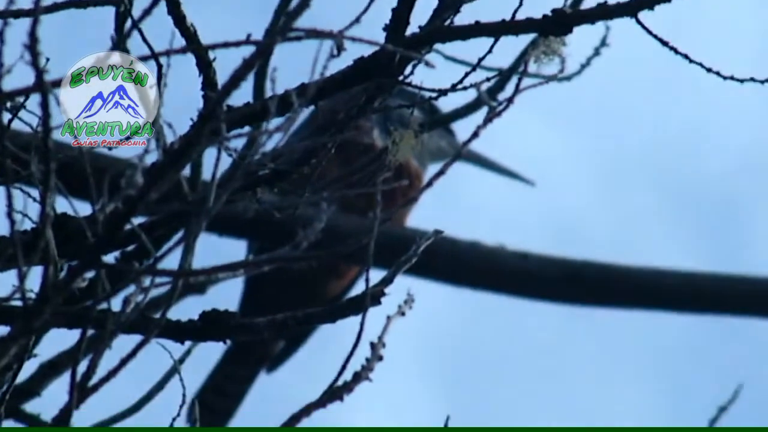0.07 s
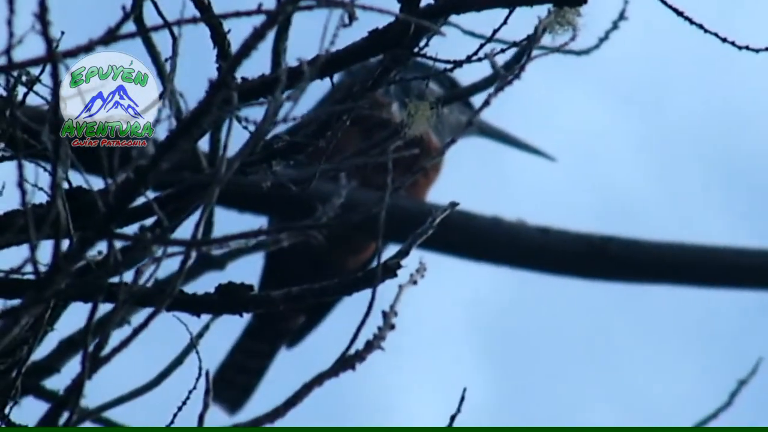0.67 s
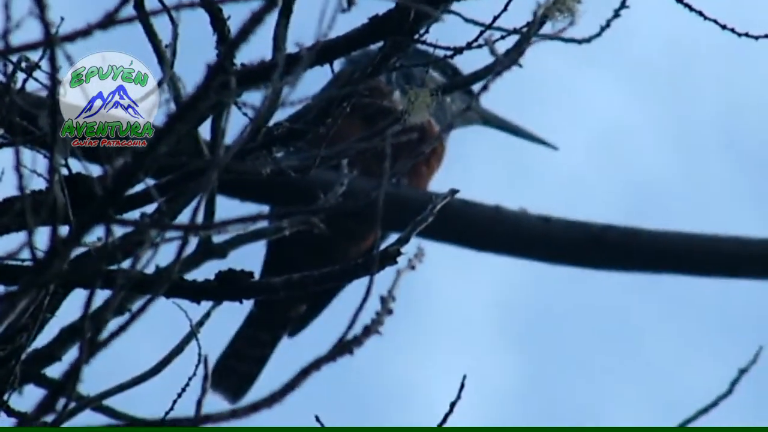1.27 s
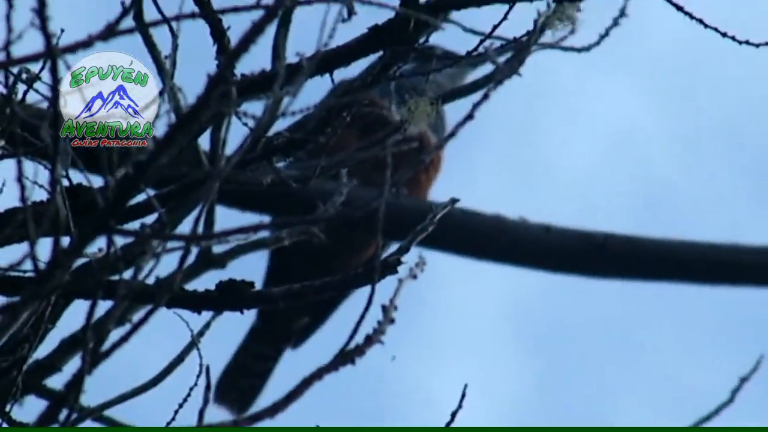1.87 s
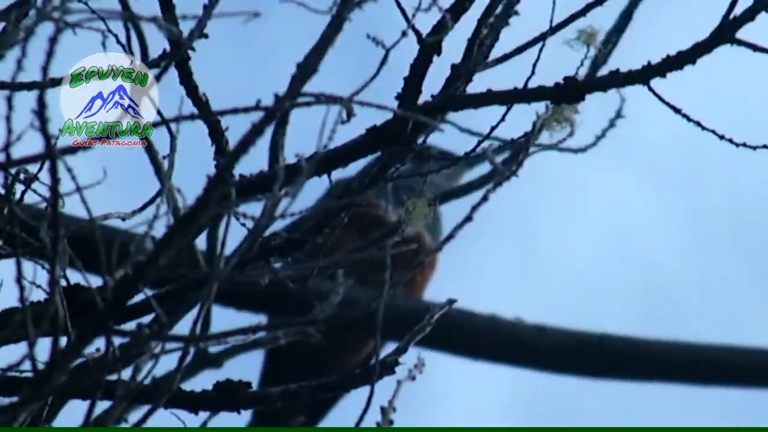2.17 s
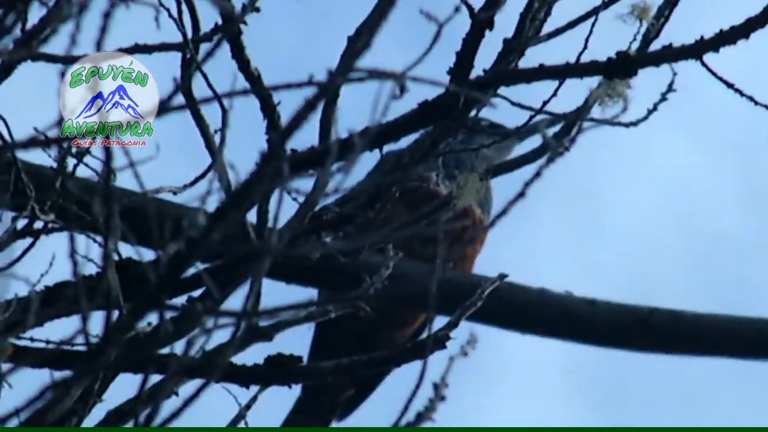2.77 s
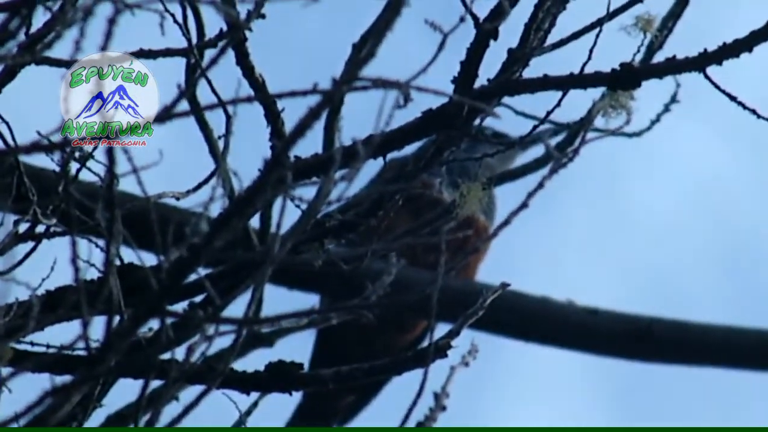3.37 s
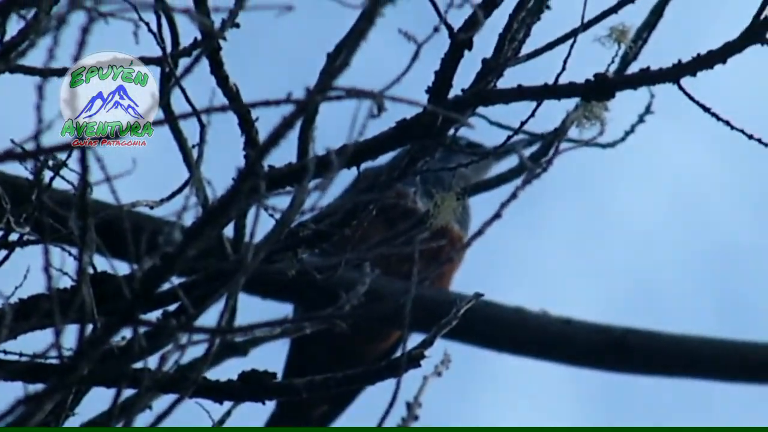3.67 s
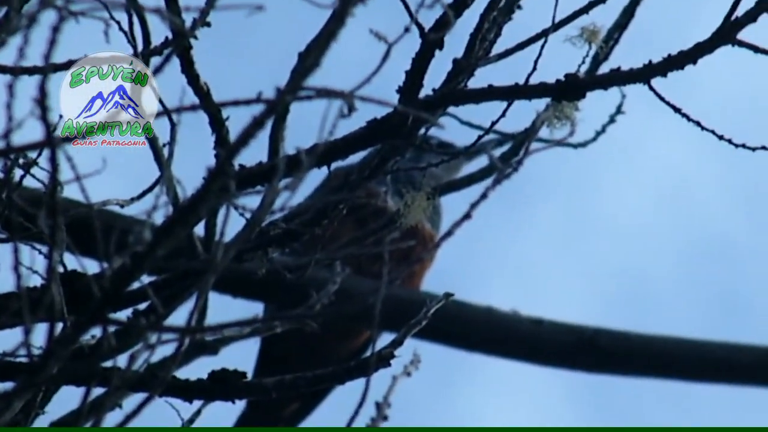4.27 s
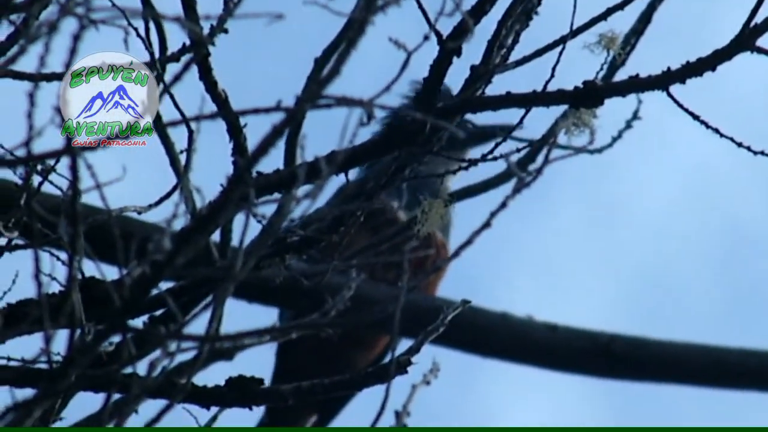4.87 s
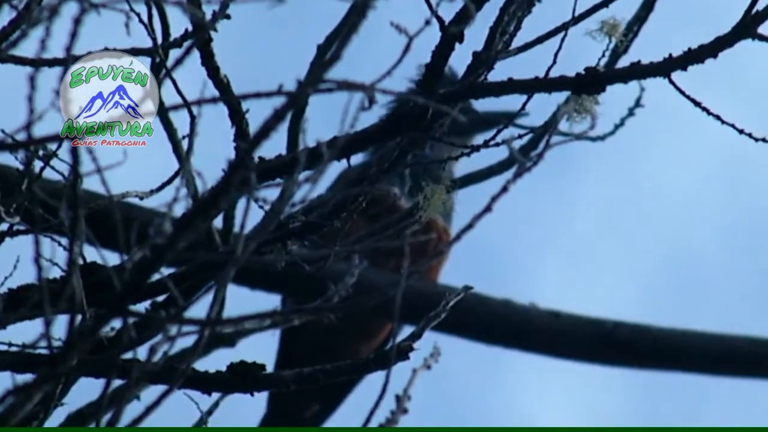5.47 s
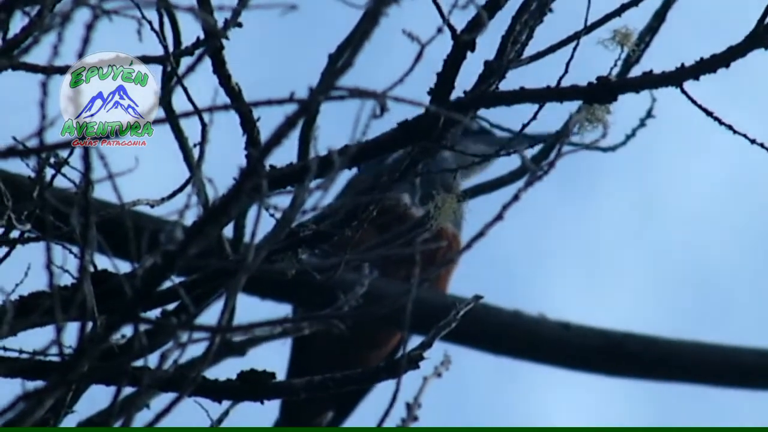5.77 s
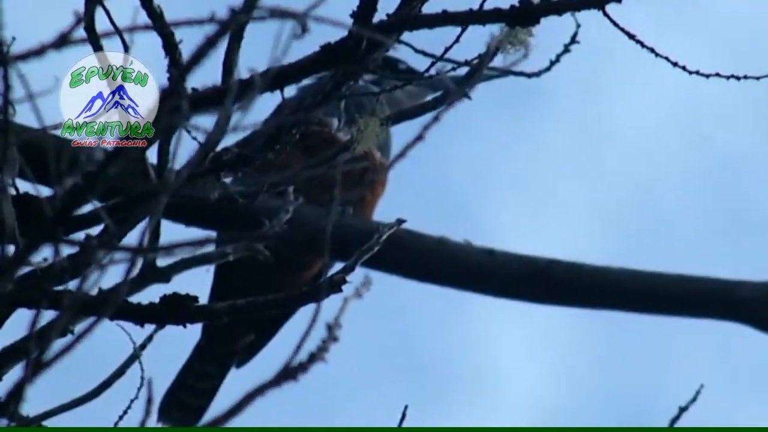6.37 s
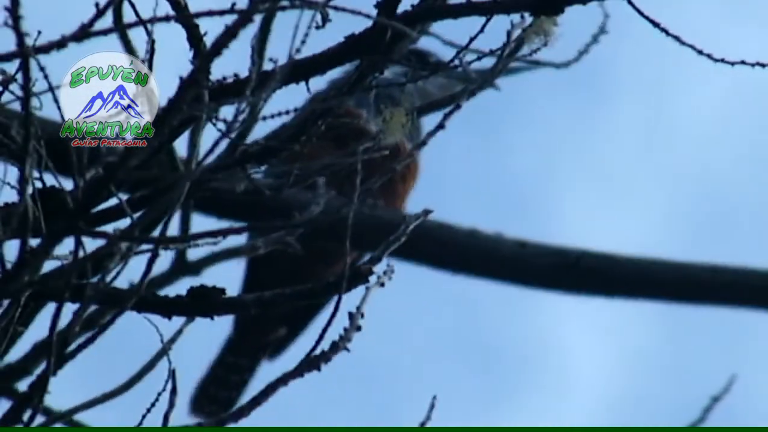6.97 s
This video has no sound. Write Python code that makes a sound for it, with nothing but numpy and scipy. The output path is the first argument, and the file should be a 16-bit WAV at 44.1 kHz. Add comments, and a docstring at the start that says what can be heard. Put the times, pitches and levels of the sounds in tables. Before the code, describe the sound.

A soft, low, uneven outdoor rush with a steady hiss runs throughout. Between about 1.1 and 1.7 seconds come five small dry ticks and one faint, thin, distant peep. At about 1.9 seconds a kingfisher in a tree begins a run of loud, harsh squawks, roughly three a second. Each is short and raspy, quavering at the start and dropping in pitch at the end. The background rush swells slightly around 3.2 seconds. From about 4.8 seconds a second bird joins with five higher, slightly cleaner, quavering screams, overlapping the first, whose calls grow weaker after 5 seconds. Another small tick falls near 6.4 seconds. The second bird stops at about 6.7 seconds and the kingfisher's last call ends near 6.9. The surrounding trees give every call a short, bright echo. The sound is centred and nearly mono.

```python
"""A soft outdoor rush and recorder hiss, with a few small ticks and one faint, far peep. Then a kingfisher
perched in a tree gives a run of harsh falling calls; a second, higher voice joins in with quavering ones.
Each call is a stack of harmonics shaken by a fast flutter, with a rasp of turbulent air.
Trunks and the wood around answer. All is nearly mono."""
import sys
import numpy as np
from scipy import signal
from scipy.fft import rfft, irfft, next_fast_len
from scipy.io import wavfile
from scipy.ndimage import map_coordinates

SR = 44100
rng = np.random.default_rng(int(sys.argv[2]) if len(sys.argv) > 2 else 0)


def persist_wave(psi):
    """Save psi, clipped to +-1, as 16-bit WAV."""
    counts = np.round(np.clip(psi, -1, 1) * 32767).astype(np.int16)
    wavfile.write(sys.argv[1], SR, np.atleast_2d(counts).T)


N = 310023


def amp(db):
    """Decibels to gain."""
    return 10 ** (np.asarray(db) / 20)


def unit(x):
    """Scale to rms 1."""
    return x / np.sqrt(np.mean(x ** 2) + 1e-20)


def ramp(x):
    """Clip to 0..1."""
    return np.clip(x, 0, 1)


def bump(x, centre, width):
    """Bell curve of height 1."""
    return np.exp(-((x - centre) / width) ** 2)


def along(points, hz):
    """Read (Hz, value) points on a log axis."""
    f, v = np.transpose(points)
    return np.interp(np.log(hz + 1), np.log(f + 1), v)


def wobble(knots_per_s, size):
    """Smooth random curve."""
    knots = rng.standard_normal(512)
    return map_coordinates(knots, [np.arange(size) * knots_per_s / SR], mode="wrap")


def filtered(x, response):
    """Apply a response given as a function of Hz."""
    size = x.shape[-1]
    padded = next_fast_len(size + 4096)
    return irfft(rfft(x, padded) * response(np.fft.rfftfreq(padded, 1 / SR)), padded)[..., :size]


def noise(colour, size):
    """Noise of rms 1 with the given spectrum."""
    return unit(filtered(rng.standard_normal(size), lambda hz: amp(along(colour, hz))))


def add(track, start_s, sound):
    """Mix a sound into the track."""
    span = track[round(start_s * SR):][:len(sound)]
    span += sound[:len(span)]


# Course of the rush. Each row: time in seconds, relative level in dB.
RUSH_LEVEL_DB = [(0.0, -49.5), (0.72, -52), (2.8, -47.5), (3.25, -43), (4.01, -48.5), (6.93, -49),
                 (7.03, -48.5)]
# Spectra of rush and hiss. Each row: frequency in Hz, relative density in dB.
RUSH_SPECTRUM = [(20, -3.5), (60, -3.5), (130, -0.5), (240, -2), (400, -1), (700, -1.5), (1000, -4),
                 (1500, -6), (3000, -18), (8000, -51)]
HISS_SPECTRUM = [(100, 5), (1000, 6.5), (3000, 2), (4500, 2), (6200, 5.5), (7200, -7.5), (8000, -14),
                 (10000, -9.5), (14000, -27)]


def background(throb_hz=285, half_width_hz=35):
    """Low, uneven outdoor rush with a hollow throb, plus steady recorder hiss."""
    level_db = np.interp(np.arange(N) / SR, *np.transpose(RUSH_LEVEL_DB))
    rush = amp(2.2 * wobble(16, N)) * noise(RUSH_SPECTRUM, N)
    hollow = filtered(rng.standard_normal(N), lambda hz: 1 / (1 + ((hz - throb_hz) / half_width_hz) ** 2))
    throb = amp(-9.5 + 5.3 * wobble(11, N)) * unit(hollow)
    return amp(level_db + 2) * (rush + throb) + amp(-50) * noise(HISS_SPECTRUM, N)


def far_bird(start_s=1.66, length_s=.1, pitch_hz=5750, level_db=-55):
    """One thin, wavering peep."""
    out, size = np.zeros(N), round(length_s * SR)
    phase = 2 * np.pi * np.cumsum(pitch_hz * (1 + 0.015 * wobble(150, size))) / SR
    add(out, start_s, amp(level_db) * np.sqrt(2 * np.hanning(size)) * np.sin(phase))
    return out


# Small ticks. Each row: start in seconds, relative level in dB.
TICK_EVENTS = [(1.1281, -31.5), (1.2414, -37.5), (1.3613, -39), (1.4486, -39), (1.6436, -34), (6.406, -28)]
# Tick spectrum. Each row: frequency in Hz, relative density in dB.
TICK_SPECTRUM = [(100, -8), (300, 4), (700, -7), (2000, -6), (3500, 1.5), (6000, 4), (8000, -12),
                 (13000, -25)]


def ticks(t60_s=0.04):
    """Dry noise bursts that die at once."""
    out, age = np.zeros(N), np.arange(SR // 8) / SR
    for start_s, db in TICK_EVENTS:
        add(out, start_s, amp(db - 2.0 - 60 * age / t60_s) * noise(TICK_SPECTRUM, len(age)))
    return out


# Decay of the wood's echo. Each row: frequency in Hz, T60 in seconds.
WOOD_T60_S = [(300, 0.13), (1500, 0.92), (3500, 0.67), (6000, 0.89), (12000, 0.81)]
# Its colour. Each row: frequency in Hz, relative gain in dB.
WOOD_SPECTRUM = [(800, -11.5), (1700, -17.5), (2300, 5.5), (2750, -1), (3250, -3), (3750, 8), (6000, -2),
                 (12000, 0)]


def wood(x, build_s=0.0055):
    """Diffuse echo of the trees: swells briefly, then each frequency dies at its own rate."""
    hz, t, spectra = signal.stft(rng.standard_normal(SR), SR, nperseg=256)
    level_db = along(WOOD_SPECTRUM, hz)[:, None] - 60 * t / along(WOOD_T60_S, hz)[:, None]
    envelope = amp(level_db) * (1 - np.exp(-t / build_s))
    tail = signal.istft(spectra * envelope, SR, nperseg=256)[1]
    return signal.fftconvolve(x, tail / np.linalg.norm(tail))[:N]


def trunks(x, count=12, spread_s=.07):
    """Discrete reflections off nearby trunks and limbs."""
    echoes = np.zeros(SR // 2)
    for lag, strength in rng.uniform(0, 1, (count, 2)):
        add(echoes, .002 + spread_s * lag, np.array([strength * (1 - lag / 2)]))
    return signal.fftconvolve(x, echoes / np.linalg.norm(echoes))[:N]


def bill(hz, centre_hz=2950, width_hz=380):
    """Main resonance of the open bill, 0..1."""
    return bump(hz, centre_hz, width_hz)


# Turbulent air in a call. Each row: frequency in Hz, relative density in dB.
RASP_SPECTRUM = [(200, -16), (600, -14.5), (1050, 1), (1350, -7), (2000, 2.5), (2400, -4.5), (3000, 4),
                 (4000, 7), (4700, 2.5), (5600, 4), (6700, -2.5), (7400, -12.5), (10000, -14.5),
                 (14000, -27)]


def air_rasp(phase, flutter, bill_db):
    """Air escapes in puffs, once a cycle and once a flutter."""
    size = len(phase)
    puffs = unit(amp(2.4 * flutter + 2.9 * np.cos(phase) + 2.6 * wobble(93.7, size)))
    air = puffs * rng.standard_normal(SR // 2)[:size]
    return unit(filtered(air, lambda hz: amp(along(RASP_SPECTRUM, hz) + bill_db * bill(hz))))


def syrinx(gesture, throat, break_s, bill_db, flicker_db, crack, jitter, flutter_am, flutter_fm,
           rasp_gain_db, flutter_hz=285, attack_s=0.0033, release_s=0.0021, air_release_s=.024):
    """One call: membrane harmonics, shaken by a flutter that also chops the escaping air."""
    pitch_hz, tone_db, rasp_db = gesture
    size = len(pitch_hz)
    age = np.arange(size) / SR
    left_s = age[::-1]
    # More rasp against tone: less steady membranes, above all as the voice cracks in.
    push_db = np.clip(rasp_db - tone_db + 1.0, -8, 5)
    strain = np.clip(amp(push_db), .35, .85) + crack * bump(age, 0, 0.068)
    flutter = np.sin(2 * np.pi * np.cumsum(flutter_hz * (1 + 0.184 * wobble(170.3, size))) / SR)
    pitch_hz = pitch_hz * (1 + 0.0102 * strain * wobble(129.9, size))
    detune = strain * (jitter * wobble(910.5, size) + flutter_fm * flutter)
    phase = 2 * np.pi * np.cumsum(pitch_hz * (1 + detune)) / SR
    order = np.arange(1, 13)[:, None]
    partial_hz = order * pitch_hz
    # Starts an octave up; period doubling brings in the odd harmonics, unsteadily.
    doubling = amp(flicker_db * strain * wobble(118.4, size)) * ramp(age / break_s) ** 2
    # A harder push sharpens each cycle and lifts the high harmonics.
    edge_db = (2.0 + 0.69 * push_db) * ramp((partial_hz - 3300) / 1500)
    gains = amp(along(throat, partial_hz) + bill_db * bill(partial_hz) + edge_db)
    gains *= np.where(order % 2, doubling, 1)
    gains /= np.linalg.norm(gains, axis=0)
    partials = np.sin(order * phase + rng.uniform(0, 2 * np.pi, order.shape))
    tone = np.sqrt(2) * np.sum(gains * partials, axis=0)
    tone *= 1 + flutter_am * strain * flutter
    tone *= 1 + 0.41 * np.tanh(strain * wobble(128.5, size))
    rasp = air_rasp(phase, flutter, bill_db) * ramp(left_s / air_release_s)
    gate = ramp(age / attack_s) * ramp(left_s / release_s)
    return gate * (amp(tone_db) * tone + amp(rasp_db + rasp_gain_db) * rasp)


# Arch of every scream. Each row: share of the length, base pitch in Hz, base warble depth as a
# share of pitch, tone offset in dB.
SCREAM_ARCH = [(0, 996.7, 0.047, 2), (.075, 1058, 0.068, 1.5), (.19, 1083, 0.074, -1),
               (.47, 1147, 0.032, -2.5), (.68, 1085, .04, -1.5), (.82, 988, 0.013, 1.5),
               (1, 955, 0.0069, -3)]


def scream_gesture(length_s, pitch_ratio, warble_hz, warble_ratio, tone_db, rasp_db,
                   crest_s=.0295, swell_s=.012, rasp_rise_s=0.028, fade_s=0.043):
    """Pitch, tone and rasp curves: a warble riding on an arch."""
    age = np.arange(round(length_s * SR)) / SR
    share, *columns = np.transpose(SCREAM_ARCH)
    arch_hz, depth, arch_db = (np.interp(age / length_s, share, column) for column in columns)
    warble = warble_ratio * depth * np.cos(2 * np.pi * warble_hz * (age - crest_s))
    pitch_hz = pitch_ratio * arch_hz * (1 + warble)
    fade_db = 11 * ramp(1 - (length_s - age) / fade_s)
    swell_db = 3.5 * ramp(1 - age / swell_s)
    rise_db = 7.5 * ramp(1 - age / rasp_rise_s)
    return pitch_hz, tone_db + arch_db - swell_db - fade_db, rasp_db - rise_db - fade_db / 2


# Second bird's throat and bill. Each row: frequency in Hz, relative harmonic gain in dB.
SCREAM_THROAT = [(1050, -5.5), (2000, -1), (2300, 6), (3000, 11), (3500, 0), (4300, -5), (5200, -13.5),
                 (5800, 2.5), (6400, -12), (7500, -22), (9700, -21.5), (13000, -38)]
# Its calls. Each row: start and length in seconds, pitch ratio, warble rate in Hz, warble depth ratio,
# relative tone and rasp levels in dB.
SCREAM_CALLS = [ (4.845, 0.18, 0.98, 32.6, .75, -29.5, -38), (5.196, 0.18, 0.99, 30.17, 1.03, -26, -28.5),
                (5.572, 0.19, 1, 30.13, 1.05, -25, -25.5), (5.998, .188, 1.002, 30.13, 1.11, -24.5, -25.5),
                (6.503, 0.2, 1.006, 28.43, 0.87, -25, -27.5), ]


def second_bird():
    """Quavering screams, higher and a little cleaner than the first voice."""
    out = np.zeros(N)
    for start_s, *shape in SCREAM_CALLS:
        scream = syrinx(scream_gesture(*shape), SCREAM_THROAT, break_s=0.0025, bill_db=1.5,
                        flicker_db=1.8, crack=0.042, jitter=0.0087,
                        flutter_am=0.32, flutter_fm=0.0028, rasp_gain_db=-11)
        add(out, start_s, amp(1.5) * scream)
    return out


def squawk_gesture(length_s, held_hz, overshoot, drop_share, depth, crest_s, tone_db, swell_db, fade_db,
                   rasp_db, quaver_hz=29.97, quaver_decay_s=0.057, swell_s=.012, drop_s=.06):
    """Pitch, tone and rasp curves: the voice quavers, settles, then drops as the breath gives out."""
    age = np.arange(round(length_s * SR)) / SR
    drop = ramp(1 - (length_s - age) / drop_s) ** 2
    onset = ramp(1 - age / swell_s)
    push = bump(age, 2.9 * crest_s, .034)
    quaver = depth * np.exp(-age / quaver_decay_s) * np.cos(2 * np.pi * quaver_hz * (age - crest_s))
    pitch_hz = held_hz * (1 + overshoot * push + quaver) * (1 - drop_share * drop)
    # The tone catches briefly; the rasp peaks early and again in the fall.
    catch_db = 11.5 * ramp(crest_s / swell_s) * bump(age, .025, 0.0021)
    tone_db = tone_db - swell_db * onset - catch_db - fade_db * age / length_s - 10 * drop
    rasp_db = rasp_db + 6.5 * (bump(age, 0.041, .03) - 1) + 5 * drop - 3 * onset
    return pitch_hz, tone_db, rasp_db


# Kingfisher's throat and bill. Each row: frequency in Hz, relative harmonic gain in dB.
SQUAWK_THROAT = [(880, -9), (1400, 9.5), (1620, 7.5), (1850, -2), (2100, -3.5), (2400, -4), (2720, 2),
                 (3020, 13), (3230, -4.5), (3700, -3.5), (4000, -2.5), (4500, -14), (5250, -3), (5800, -16),
                 (7400, -24.5), (13000, -37)]
# Its calls. Each row: start and length in seconds, held pitch in Hz, overshoot, closing drop and quaver
# depth as shares of pitch, first crest in seconds, relative tone level, swell, fade and relative rasp
# level in dB, time to break down an octave in seconds, bill resonance in dB.
SQUAWK_CALLS = [ (1.87, 0.19, 792.3, .13, 0.099, 0.068, 0.0013, -23.5, 6, 5, -30, .067, -8),
                (2.203, .153, 895, -0.019, 0.24, 0.061, 0.022, -24, -2, -0.5, -27, .008, 0.5),
                (2.485, .17, 909, 0.048, 0.24, .06, 0.017, -26, 0, -5, -22.5, 0.049, -1),
                (2.766, .162, 920, .085, 0.19, 0.033, 0.017, -22.5, 6, 0.5, -21.5, 0.0076, 1),
                (3.033, 0.17, 944, 0.11, 0.14, 0.073, .018, -24.5, 12, 2, -23.5, 0.015, -1),
                (3.299, 0.17, 927, 0.1, 0.23, .06, 0.016, -23, 7, 3.5, -23, 0.0055, 1),
                (3.572, 0.17, 906.4, 0.12, 0.25, .06, 0.014, -24.5, 6, 0.5, -23.5, 0.022, 3.5),
                (3.856, 0.18, 902.4, 0.1, .24, .045, .014, -20.5, 11, 9, -24.5, 0.017, 3),
                (4.159, 0.18, 922, 0.021, .21, 0.067, 0.016, -23, 4, 5, -26, 0.0071, 3),
                (4.465, 0.18, 929, 0.026, .28, 0.041, 0.019, -26, 12, 0, -28, 0.0042, -0.5),
                (4.794, 0.18, 891.5, .045, 0.24, 0.052, .013, -24, 8, 8, -27.5, .0055, 2.5),
                (5.136, .18, 914, 0.021, 0.21, 0.044, 0.017, -28.5, 10, -1.5, -34, 0.0054, -2),
                (5.511, 0.18, 885, 0.038, 0.19, 0.046, .017, -32.5, 6, -3, -33, 0.015, -3.5),
                (5.828, .163, 929, -0.0092, 0.18, 0.048, 0.019, -32, -7, -4, -33.5, 0.069, -3),
                (6.138, .165, 952, -0.032, 0.17, 0.042, 0.015, -28.5, 14, 5, -31, .01, -1.5),
                (6.433, 0.17, 930, 0.034, 0.2, .07, 0.014, -32, -4, -0.5, -31.5, .0044, 1.5),
                (6.751, 0.18, 896, 0.039, 0.14, 0.043, 0.014, -29, 3, 7.5, -31.5, 0.011, 2), ]


def kingfisher():
    """A run of harsh, falling squawks from a strained syrinx."""
    out = np.zeros(N)
    for start_s, *shape, break_s, bill_db in SQUAWK_CALLS:
        squawk = syrinx(squawk_gesture(*shape), SQUAWK_THROAT, break_s, bill_db,
                        flicker_db=6.0, crack=0.5, jitter=.01,
                        flutter_am=0.12, flutter_fm=0.009, rasp_gain_db=-3)
        add(out, start_s, amp(0.72) * squawk)
    return out


def scene():
    """Birds, echoes, ticks and background, all centred; the sound is practically mono."""
    birds = kingfisher() + second_bird()
    echoes = amp(-9.5) * trunks(birds) + amp(-5.0) * wood(birds)
    mid = birds + echoes + ticks() + far_bird() + background()
    side = filtered(amp(-36.5) * wood(birds), lambda hz: hz > 2200) + amp(-40) * background()
    return np.array([mid + side, mid - side])


def record(dry, notch_hz=4840, half_width_hz=160, top_hz=14300):
    """The microphone port cuts a narrow notch; nothing passes above the band limit."""
    port = lambda hz: 1 - 1 / (1 + 1j * (hz - notch_hz) / half_width_hz)
    return filtered(dry, lambda hz: port(hz) * (hz < top_hz))


dry = scene()
out = record(dry)
persist_wave(out)
```